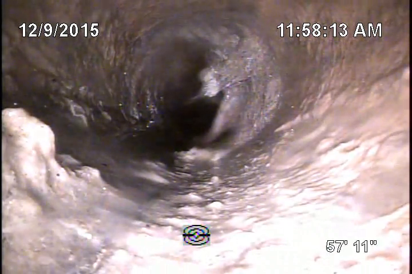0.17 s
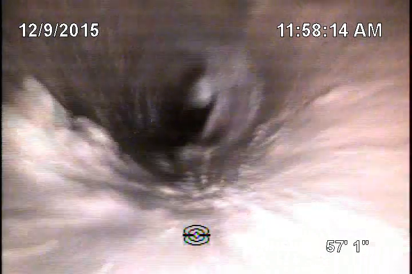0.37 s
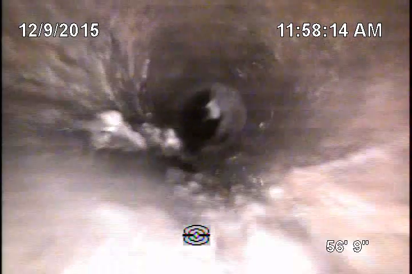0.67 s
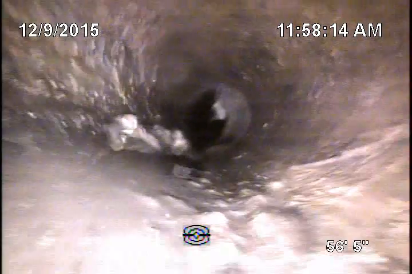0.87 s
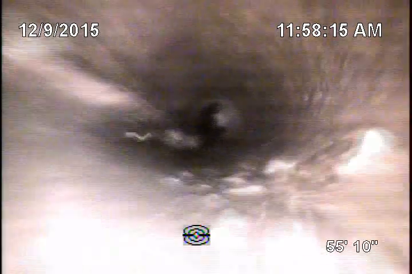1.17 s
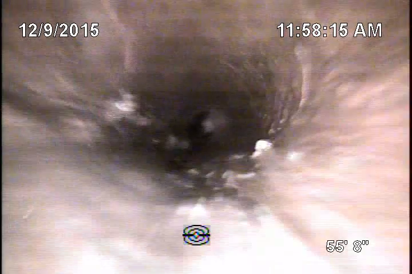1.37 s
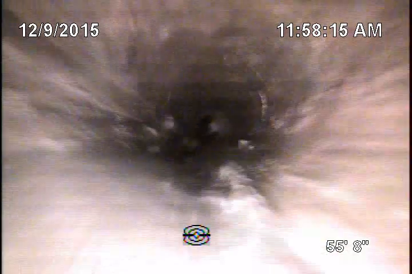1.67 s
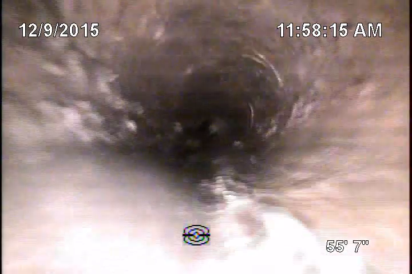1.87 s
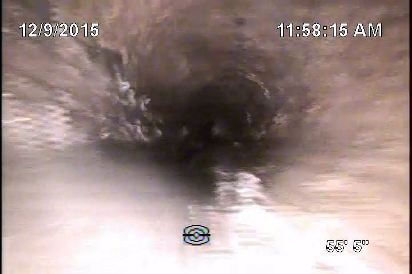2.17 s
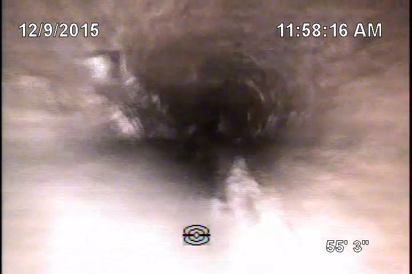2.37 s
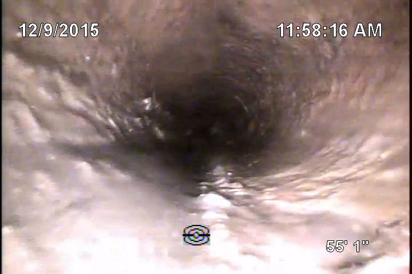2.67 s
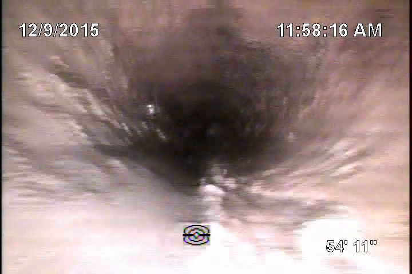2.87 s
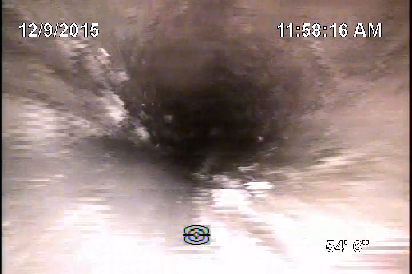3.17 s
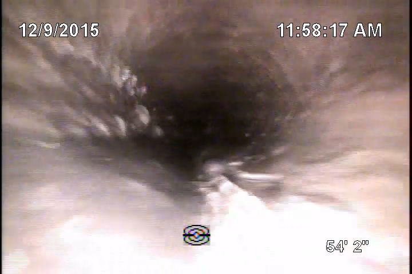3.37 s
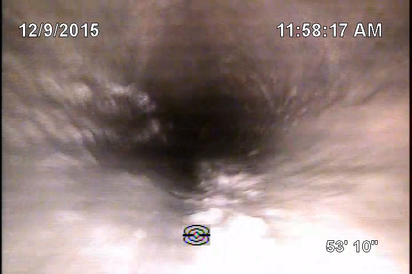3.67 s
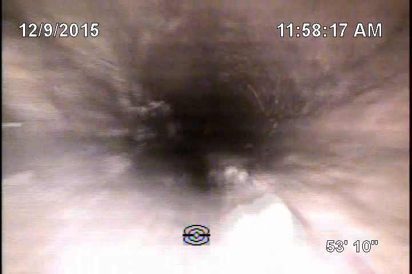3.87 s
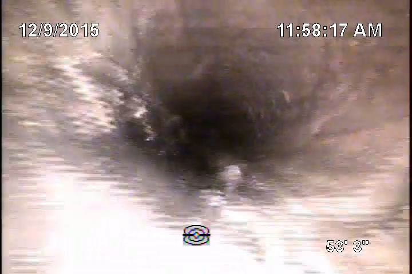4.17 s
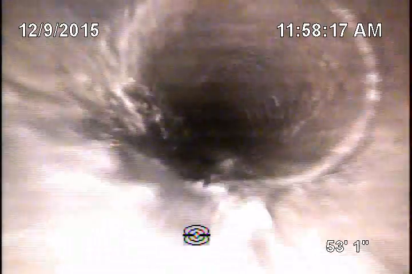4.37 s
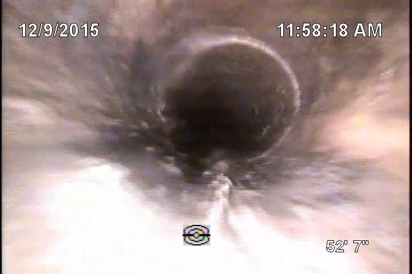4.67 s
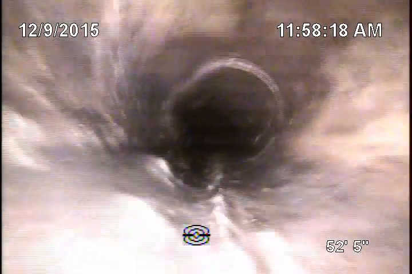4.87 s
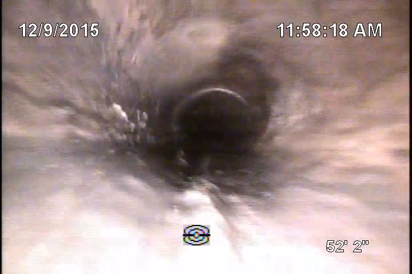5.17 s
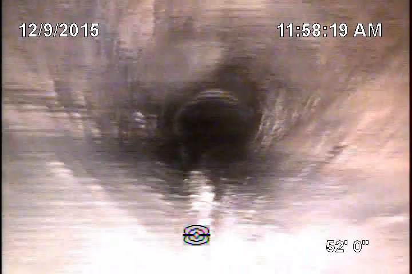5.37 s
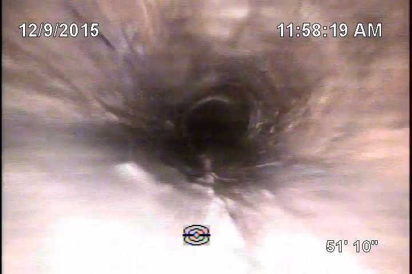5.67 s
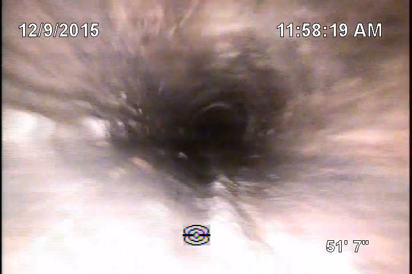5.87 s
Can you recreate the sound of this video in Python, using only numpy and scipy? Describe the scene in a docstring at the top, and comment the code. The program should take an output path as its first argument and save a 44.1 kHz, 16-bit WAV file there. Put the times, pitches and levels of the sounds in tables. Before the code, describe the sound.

Very close to a metal cable reel, a stiff cable is pulled back in jerky strokes. A cluster of hard knocks opens, then light sliding, a few clacks, a strong rasp midway, bright ticks, and a sharp crack with a small ping. Two heavier slaps follow, the last overloading the small microphone and leaving the cage ringing. Faint hiss and a thin high whine stay underneath.

```python
"""Strokes of rasping and hiss, hard knocks, metallic ringing and ticks: a stiff push cable is pulled
back out of a drain and fed onto its metal reel. Friction is dense noise grains through a gliding resonance;
knocks are decaying noise plus a short tone; the cage is a sum of modes, its loose coils are noise that
follows the energy of the push. A small microphone close to the reel overloads; its electronics hiss and whine."""
import sys
import numpy as np
from scipy import signal
from scipy.fft import rfft, irfft
from scipy.io import wavfile

SR = 44100
rng = np.random.default_rng(int(sys.argv[2]) if len(sys.argv) > 2 else 0)


def wrap_up_sound(samples):
    """Save the sound to the file named by the first command line argument, as 16-bit audio."""
    columns = np.atleast_2d(samples).T
    # keep every value between -1 and 1, then stretch to whole-number steps
    tamed = np.clip(columns, -1, 1)
    steps = np.round(tamed * 32767).astype(np.int16)
    wavfile.write(sys.argv[1], SR, steps)


N = 264600
TIME = np.arange(N) / SR
CUTOFF_HZ = 16000


def from_db(db):
    """Decibels to gain."""
    return 10 ** (np.asarray(db) / 20)


def rms_one(x):
    """Scale to rms 1."""
    return x / np.sqrt(np.mean(x ** 2) + 1e-20)


def dying(t60_s):
    """Exponential decay, 60 dB in t60_s, cut off after 1.5 t60_s."""
    return np.exp(-np.log(1000) * TIME[:int(1.5 * t60_s * SR)] / t60_s)


def add(out, start_s, sound):
    """Mix a sound in from start_s on."""
    start = int(np.clip(round(start_s * SR), 0, N - 1))
    out[start:start + len(sound)] += sound[:N - start]


def coloured(x, spectrum):
    """Weight by a spectrum, interpolated over log frequency; rms 1."""
    hz, db = np.transpose(spectrum)
    bins_hz = np.fft.rfftfreq(N, 1 / SR) + 1e-3
    gain_db = np.interp(np.log(bins_hz), np.log(hz), db)
    return rms_one(irfft(rfft(x) * from_db(gain_db), N))


def noise(spectrum):
    """Smooth Gaussian noise with a spectrum; rms 1."""
    return coloured(rng.standard_normal(N), spectrum)


def drift(rate_hz):
    """Low-passed noise as slow chance; rms 1."""
    lowpass = signal.butter(2, rate_hz, fs=SR, output="sos")
    return rms_one(signal.sosfilt(lowpass, rng.standard_normal(N)))


def resonance(x, hz, width_hz):
    """Two-pole band-pass with gain about 1 on top."""
    r = np.exp(-np.pi * width_hz / SR)
    zeros = np.array([1, 0, -1]) * (1 - r * r) / 2
    poles = [1, -2 * r * np.cos(2 * np.pi * hz / SR), r * r]
    return signal.lfilter(zeros, poles, x)


def swept(x, hz, width_hz, block=128):
    """Resonance whose centre follows the curve hz block by block; rms 1."""
    out, state = np.zeros(N), np.zeros(2)
    r = np.exp(-np.pi * width_hz / SR)
    for i in range(0, N, block):
        poles = [1, -2 * r * np.cos(2 * np.pi * hz[i] / SR), r * r]
        out[i:i + block], state = signal.lfilter([1, 0, -1], poles, x[i:i + block], zi=state)
    return rms_one(out)


def mode(hz, t60_s):
    """Struck mode: a decaying sine, envelope starting at 1."""
    fall = dying(t60_s)
    return fall * np.sin(2 * np.pi * hz * TIME[:len(fall)])


def slips(grains_per_s, judder_db, size_db=0.0, judder_hz=90, smooth=0.16):
    """Dense tiny catches and contacts over some smooth noise, clumped by the cable's judder."""
    sizes = from_db(size_db * np.minimum(rng.exponential(1, N), 4)) * rng.choice([-1, 1], N)
    catches = rng.random(N) < grains_per_s / SR
    grains = rms_one(sizes * catches) + smooth * rng.standard_normal(N)
    return grains * from_db(judder_db * drift(judder_hz))


def electronics(hiss_db=-52.5, whine_db=-59.5, whine_hz=8000):
    """Steady coloured noise and one sine; levels are rms."""
    # noise floor: f/Hz, density/dB per Hz (relative)
    floor_spectrum = [(25, -12), (100, -12.5), (170, -9.5), (225, -12), (300, 1.5), (450, -15), (750, -1),
                      (1200, -6.5), (3200, -4.5), (6000, -4.5), (10000, -18), (13000, -5.5), (16000, -26)]
    whine = from_db(whine_db) * np.sqrt(2) * np.sin(2 * np.pi * whine_hz * TIME)
    return from_db(hiss_db) * noise(floor_spectrum) + whine


def bumps(t60_s=0.31, hz=205, width_hz=140):
    """Dull thuds of the frame rocking on its feet: decaying noise through a double resonance."""
    # rocks of the frame: t/s, level/dB
    bump_table = [(0.22, -37), (0.457, -45), (1.345, -44.5), (2.053, -34), (2.201, -38), (3.05, -32.5),
                  (3.096, -35.5), (3.341, -34.5), (3.428, -51), (3.905, -44.5), (4.3, -44.5), (4.383, -43),
                  (4.551, -38), (5.321, -45.5), (5.639, -48.5), (5.839, -46), (5.966, -52)]
    envelope = np.zeros(N)
    for start_s, db in bump_table:
        add(envelope, start_s, from_db(db) * dying(t60_s))
    once = resonance(rng.standard_normal(N), hz, width_hz)
    return envelope * rms_one(resonance(once, hz, width_hz))


def ping(base_hz=7258):
    """One small steel part pings: two close modes beat as they fade."""
    # modes of the part: t/s, offset from base_hz/Hz, level/dB, t60/s
    ping_modes = [(3.71, 2.9, -5, 0.088), (3.712, 26, -23.5, 0.26)]
    out = np.zeros(N)
    for start_s, offset_hz, db, t60_s in ping_modes:
        add(out, start_s, from_db(db) * mode(base_hz + offset_hz, t60_s))
    return out


def ticks(t60_s=0.03, trim_db=-7.5):
    """Coils snap past each other: bright noise bursts, over too soon to stir the cage."""
    # snaps: t/s, level before trim_db/dB
    tick_table = [(0.3607, -25.5), (1.5775, -28), (2.1057, -22), (2.2034, -31), (2.7426, -10.5),
                  (2.771, -13), (2.969, -14), (3.0937, -7), (3.1855, -24), (3.2735, -34), (3.345, -17.5),
                  (3.898, -20), (4.8332, -28.5), (5.2118, -22), (5.3877, -24), (5.4635, -24),
                  (5.6527, -26.5), (5.705, -18), (5.989, -17)]
    # snap spectrum: f/Hz, density/dB per Hz (relative)
    snap_spectrum = [(500, -23), (1500, -18), (3000, 10.5), (6000, 1.5), (12000, 4), (16000, 1)]
    envelope = np.zeros(N)
    for start_s, db in tick_table:
        add(envelope, start_s, from_db(db + trim_db) * dying(t60_s))
    return envelope * noise(snap_spectrum)


def shiver(push, level_db=-3.0, low_t60_s=0.75, high_t60_s=0.16, split_hz=1500, rebounds_per_s=80, rebound_db=-9):
    """Loose coils shiver and rebound with the energy of each push; the bright part dies first."""
    # loose-coil spectrum: f/Hz, density/dB per Hz (relative)
    coil_spectrum = [(80, -18.5), (165, -24), (225, 9), (330, -9.5), (440, 1), (560, -0.5), (800, 2.5),
                     (1900, 3), (3000, 0.5), (4500, -11), (8000, -18), (16000, -27)]
    rebounds = rms_one(rng.standard_normal(N) * (rng.random(N) < rebounds_per_s / SR))
    contacts = slips(grains_per_s=1200, judder_db=0.5)
    rattle = coloured(contacts + from_db(rebound_db) * rebounds, coil_spectrum)
    low = signal.lfilter(*signal.butter(1, split_hz, fs=SR), rattle)
    out = np.zeros(N)
    for part, t60_s in ((low, low_t60_s), (rattle - low, high_t60_s)):
        keep = np.exp(-2 * np.log(1000) / (t60_s * SR))  # energy kept per sample
        energy = signal.lfilter([1 - keep], [1, -keep], push ** 2 + 1e-18)
        out += part * np.sqrt(energy)
    return from_db(level_db) * out


def cage(push, level_db=-12.0):
    """The cage answers the push with a few strong modes, by convolution."""
    # main modes: f/Hz, level/dB (relative), t60/s
    cage_modes = [(233, 13, 0.24), (241.6, -3, 0.3), (448, 1.5, 0.61), (469, -10.5, 1), (763, -0.5, 0.56),
                  (815, 3, 0.52), (989, 2, 0.45), (1270, 0.5, 0.56), (1450, -4, 0.27), (1795, -13, 0.23),
                  (1985, -20, 0.3), (2035, -7.5, 0.29), (2290, -2.5, 0.4), (3640, -7, 0.46)]
    response = np.zeros(N)
    for k, (hz, db, t60_s) in enumerate(cage_modes):
        add(response, 0, (-1) ** k * from_db(db) * mode(hz, t60_s))
    response = response[:SR] / np.linalg.norm(response)
    return from_db(level_db) * signal.fftconvolve(push, response)[:N]


def knocks(spot_width_hz=1100, broad=0.19, rise_s=0.00073, crack=0.4, crack_t60_s=0.0099, softness=2.5):
    """Each slap is a crack at the struck spot's pitch and a clatter of coils; returns sound and push on cage."""
    # cable slapping the reel: t/s, clatter level/dB, clatter t60/s, f of spot struck/Hz, push re clatter/dB
    knock_table = [(0.0156, -10, 0.073, 1890, 2.5), (.043, -9.5, 0.043, 1110, -3.5),
                   (.052, 0.5, 0.034, 1710, -10), (.087, -11.5, 0.027, 1390, -9),
                   (.127, -14, 0.046, 1530, -6), (0.439, -30, 0.082, 2080, -10),
                   (0.459, -29.5, 0.042, 450, -5), (0.777, -13, .018, 2040, -3),
                   (0.793, -2, 0.039, 1750, -9.5), (0.8721, -12.5, .02, 1450, -3),
                   (1.913, -16, 0.042, 1650, -2), (1.9391, -7.5, 0.014, 1650, -3),
                   (2.051, -16.5, 0.058, 890, -10), (2.063, -11.5, 0.038, 1240, -22),
                   (2.111, -22, 0.021, 1600, -24), (2.204, -29, 0.052, 880, -3.5),
                   (2.368, -38.5, 0.06, 1770, -3), (2.545, -18, .04, 1840, -24),
                   (2.59, -17, 0.017, 1960, -25), (2.798, -23.5, 0.064, 1710, 4.5),
                   (2.939, -26, .026, 2000, -19), (2.951, -10, 0.024, 2730, -1.5),
                   (3.071, -26, 0.047, 2000, -3), (3.0958, -0.5, 0.017, 2080, -9),
                   (3.098, -17.5, 0.18, 620, -19), (3.3428, -16.5, 0.018, 680, -7.5),
                   (3.702, 4, 0.02, 2500, -15), (3.710, 0, 0.06, 2000, -28),
                   (3.895, -18, 0.032, 1460, -5.5), (4.529, 7.5, 0.027, 1780, -17),
                   (4.861, -26, 0.039, 2140, -30), (4.928, 12.5, 0.085, 1800, -11),
                   (4.971, -2.5, 0.067, 1850, -27), (5.138, -17.5, 0.045, 2030, 0),
                   (5.143, -13, 0.023, 3570, -1.5)]
    # clatter spectrum: f/Hz, density/dB per Hz (relative)
    clatter_spectrum = [(30, -16), (120, -8), (220, -3.5), (500, 5), (1000, 3), (2000, 0.5), (3500, -2.5),
                        (6000, -13), (10000, -8.5), (16000, -1)]
    direct, push = np.zeros(N), np.zeros(N)
    clatter = noise(clatter_spectrum)
    offsets = rng.integers(0, N // 2, len(knock_table))
    for (start_s, db, t60_s, hz, push_db), offset in zip(knock_table, offsets):
        fall = dying(t60_s)
        rise = 1 - np.exp(-TIME[:len(fall)] / rise_s)
        contacts = clatter[offset:offset + len(fall)]
        # a spot that sounds low also gives more, which dulls the contact
        dull_hz = min(softness * hz, CUTOFF_HZ)
        contacts = signal.lfilter(*signal.butter(1, dull_hz, fs=SR), contacts)
        hit = (resonance(contacts, hz, spot_width_hz) + broad * contacts) * fall * rise
        hit *= from_db(db) * np.linalg.norm(fall) / np.linalg.norm(hit)  # same energy as the bare envelope
        add(direct, start_s, hit)
        add(direct, start_s, crack * from_db(db) * mode(hz, crack_t60_s))
        add(push, start_s, hit * from_db(push_db))
    return direct, push


def pull(peak_s, run_up_s, run_out_s, swell_db=27.5, run_out_db=19.5, edge_s=0.0078):
    """Friction swells to its peak, eases off and stops abruptly."""
    start_s, stop_s = peak_s - run_up_s, peak_s + run_out_s
    moving = np.interp(TIME, [start_s - edge_s, start_s, stop_s, stop_s + edge_s], [0, 1, 1, 0])
    return moving * from_db(np.interp(TIME, [start_s, peak_s, stop_s], [-swell_db, 0, -run_out_db]))


def coast(start_s, length_s, attack_s=0.019, t60_s=0.19):
    """A loose coil slides evenly: linear attack, hold, exponential release from start_s + length_s."""
    since_end_s = TIME - start_s - length_s
    release = np.exp(-np.log(1000) * np.clip(since_end_s / t60_s, 0, 2))
    return np.clip((TIME - start_s) / attack_s, 0, 1) * release


def friction(span_rise_oct_per_s=0.4, drum_loss_db_per_oct=20):
    """Movements add in power; returns drum, rasp and hiss strengths and their power-weighted pitch."""
    # pulls: t of peak/s, run-up/s, run-out/s, rasp/dB, jacket hiss/dB, f of free span at the peak/Hz
    # (peak levels, before the trims of sliding())
    pull_table = [(0.02, 0.24, 0.23, -21, -37, 1470), (0.45, 0.14, 0.048, -35.5, -45, 2400),
                  (0.626, 0.025, 0.032, -30, -29.5, 2260), (0.78, 0.041, 0.044, -16.5, -29.5, 1900),
                  (1.924, 0.12, 0.096, -24.5, -35, 1650), (2.599, 0.061, 0.052, -9.5, -27, 2200),
                  (2.941, 0.026, 0.083, -18.5, -33, 2000), (3.327, 0.021, 0.036, -33, -32.5, 1900),
                  (3.71, 0.093, 0.099, -13.5, -22, 1850), (4.385, 0.028, 0.018, -20.5, -40, 2080),
                  (4.938, 0.055, 0.17, -9, -25, 1900)]
    # coasts: t/s, length/s, rasp/dB, jacket hiss/dB, f of free span/Hz (levels before the same trims)
    coast_table = [(0.095, 0.084, -35, -39, 1490), (0.643, 0.055, -41.5, -48.5, 2430),
                   (0.737, 0.023, -32.5, -37, 1550), (0.884, 0.1, -38, -47, 1530),
                   (1.048, 0.18, -41.5, -48.5, 2450), (1.2, 0.29, -44.5, -68, 1800),
                   (1.358, 0.17, -28, -40.5, 1840), (1.55, 0.074, -44, -48, 1620),
                   (1.784, 0.057, -47.5, -52, 2020), (1.863, .025, -27, -55, 2160),
                   (2.038, 0.055, -29.5, -55, 1300), (2.391, 0.15, -43, -63, 1800),
                   (2.481, 0.035, -33, -45, 2280), (2.513, 0.075, -25.5, -39, 1930),
                   (2.599, 0.014, -21.5, -38, 3280), (2.623, 0.046, -52, -35, 3800),
                   (2.695, 0.068, -39.5, -31.5, 4100), (2.783, 0.099, -34.5, -52, 2140),
                   (3.596, 0.076, -39, -40.5, 1920), (3.749, 0.044, -29, -58, 1340),
                   (3.981, 0.077, -38, -41, 2040), (4.095, .04, -38.5, -40.5, 2500),
                   (4.266, 0.08, -46, -55, 1680), (4.41, 0.058, -43.5, -48.5, 1510),
                   (4.472, 0.066, -34, -36.5, 2000), (4.587, 0.07, -29, -39.5, 2050),
                   (4.71, 0.056, -40, -42.5, 2240), (4.859, 0.079, -35.5, -39, 2400),
                   (5.119, 0.092, -38, -45, 3600), (5.355, 0.077, -43, -41.5, 2400),
                   (5.449, 0.069, -44, -39, 2340), (5.813, 0.085, -48, -49, 2030),
                   (5.918, 0.07, -40, -42.5, 2320)]
    creep_rasp_db, creep_hiss_db, creep_hz = -60, -54.5, 2020  # the cable never quite rests
    pull_drum_db, coast_drum_db = -7.5, -10  # re rasp strength, at creep_hz

    moves = [(np.ones(N), creep_rasp_db, creep_hiss_db, coast_drum_db, np.log2(creep_hz))]
    for peak_s, up_s, out_s, rasp_db, hiss_db, hz in pull_table:
        # pitch rises as the free length of cable shortens
        octave = np.log2(hz) + span_rise_oct_per_s * (TIME - peak_s)
        moves.append((pull(peak_s, up_s, out_s), rasp_db, hiss_db, pull_drum_db, octave))
    for start_s, length_s, rasp_db, hiss_db, hz in coast_table:
        moves.append((coast(start_s, length_s), rasp_db, hiss_db, coast_drum_db, np.log2(hz)))

    drum, rasp, hiss, octaves = np.zeros((4, N))
    for shape, rasp_db, hiss_db, drum_db, octave in moves:
        power = (shape * from_db(rasp_db)) ** 2
        rasp += power
        drum += power * from_db(drum_db) ** 2
        hiss += (shape * from_db(hiss_db)) ** 2
        octaves += power * octave
    pitch_hz = 2 ** (octaves / rasp)
    # a short span shakes the cage less
    coupling = from_db(-drum_loss_db_per_oct * np.log2(pitch_hz / creep_hz))
    return coupling * np.sqrt(drum), np.sqrt(rasp), np.sqrt(hiss), pitch_hz


def sliding(span_width_hz=1350, spread_db=-13, drum_trim_db=-1.0, rasp_trim_db=-2.5, hiss_trim_db=0.7):
    """Slips drum on the cage, rasp through the free span of cable and hiss on its jacket."""
    # spectra of drumming, rasp and jacket hiss: f/Hz, density/dB per Hz (relative)
    drum_spectrum = [(30, -26), (110, -23), (165, -9.5), (220, 3), (330, -11.5), (440, 3), (560, -7.5),
                     (800, 2), (1100, -2.5), (1700, -8), (4000, -92)]
    rasp_spectrum = [(300, -26), (800, -6.5), (1300, 1), (1900, -3), (2600, -7), (3700, 1.5), (5000, 5.5),
                     (8000, 3), (16000, -47)]
    hiss_spectrum = [(1000, -35), (2500, 5), (4000, 5), (5500, 0.5), (8000, 0.5), (11000, 3), (16000, 1.5)]
    drum, rasp, hiss, pitch_hz = friction()
    grit = slips(grains_per_s=3000, judder_db=2.0)
    span = swept(swept(grit, pitch_hz, span_width_hz), pitch_hz, span_width_hz)
    span += from_db(spread_db) * grit
    drumming = coloured(slips(grains_per_s=1800, judder_db=1.5), drum_spectrum)
    rasping = coloured(span, rasp_spectrum)
    hissing = coloured(slips(grains_per_s=7400, judder_db=1.5), hiss_spectrum)
    return (drum * from_db(drum_trim_db) * drumming
            + rasp * from_db(rasp_trim_db) * rasping
            + hiss * from_db(hiss_trim_db) * hissing)


def scene(slide_to_cage_db=-20.5, slide_to_coils_db=-12):
    """Sliding and knocks both stir the cage and its coils, over the hiss and whine of the electronics."""
    slide = sliding()
    slaps, push = knocks()
    ringing = cage(push + from_db(slide_to_cage_db) * slide)
    shivering = shiver(push + from_db(slide_to_coils_db) * slide)
    mix = electronics() + bumps() + ping() + ticks() + shivering + ringing + slaps + slide
    return mix[None]


def record(dry, ceiling=0.58, bias_limit=3.2, thump_db=-11, thump_hz=75, recovery_hz=30):
    """The preamplifier flattens peaks; the hardest overload shifts its bias, a low thump; the top is cut."""
    clipped = dry / (1 + (dry / ceiling) ** 8) ** (1 / 8)
    excess = np.maximum(np.abs(dry) - bias_limit, 1e-18)
    bias = signal.sosfilt(signal.butter(2, thump_hz, fs=SR, output="sos"), excess)
    bias = signal.sosfilt(signal.butter(2, recovery_hz, "high", fs=SR, output="sos"), bias)
    lowpass = signal.firwin(255, CUTOFF_HZ, fs=SR, window="blackman")
    return signal.fftconvolve(clipped + from_db(thump_db) * bias, lowpass[None], "same")


dry = scene()
out = record(dry)
wrap_up_sound(out)
```